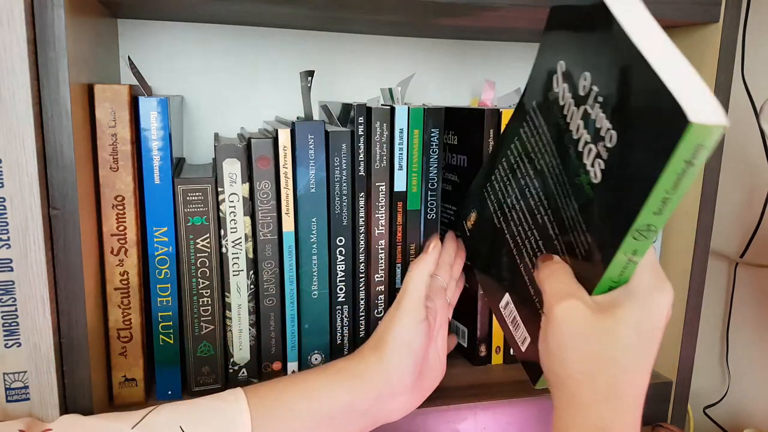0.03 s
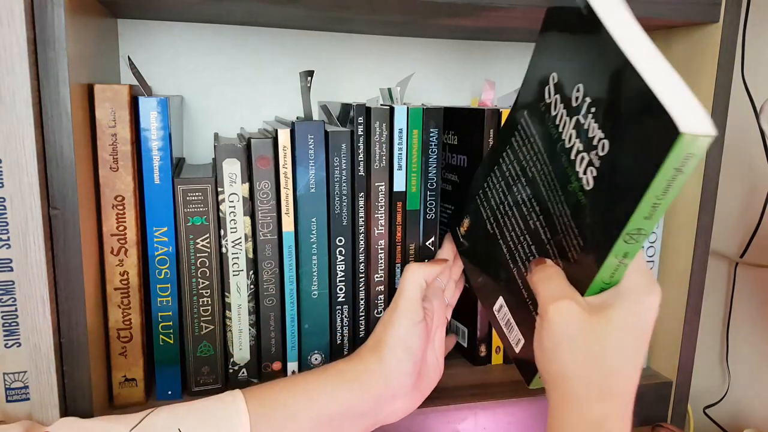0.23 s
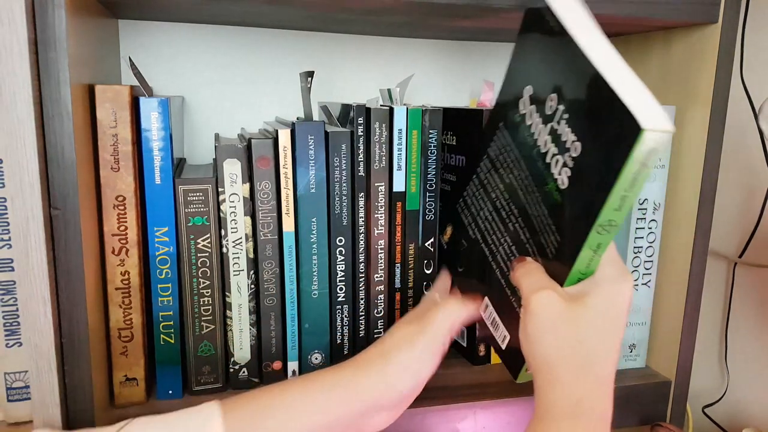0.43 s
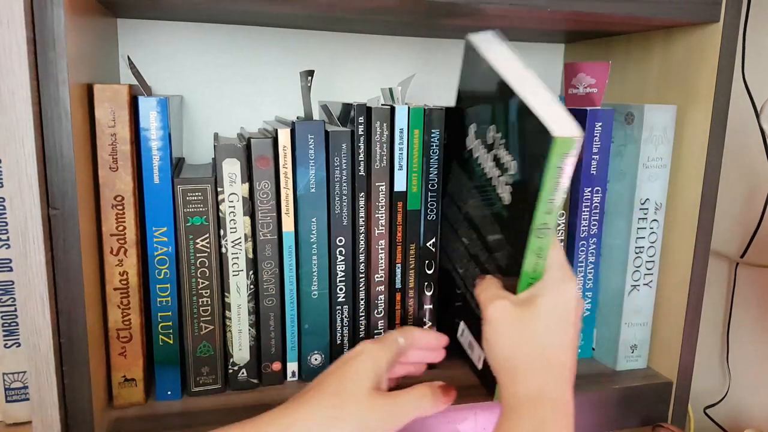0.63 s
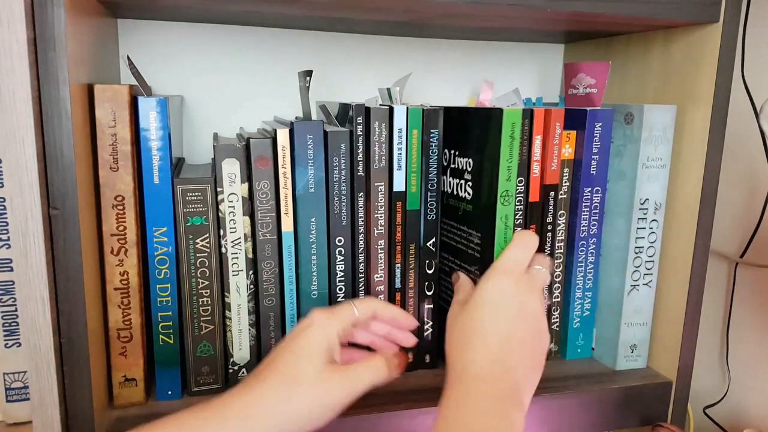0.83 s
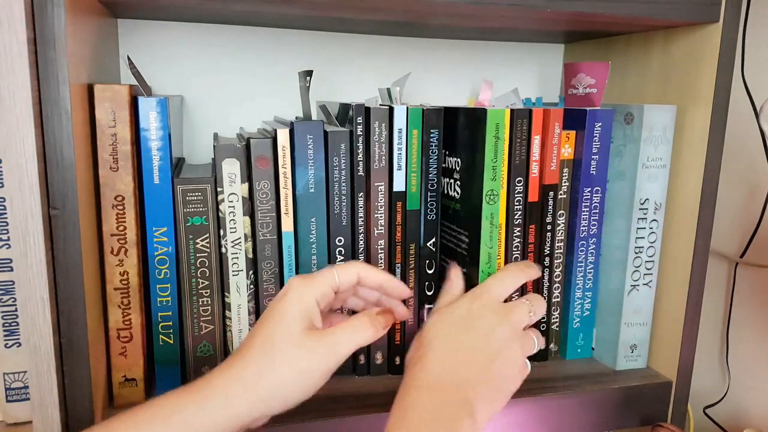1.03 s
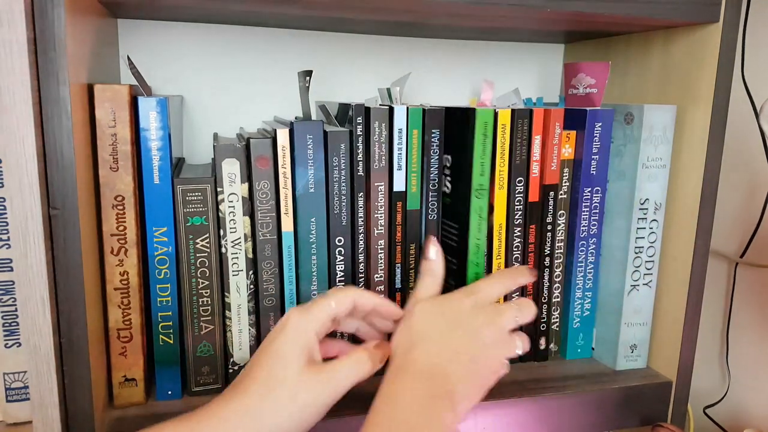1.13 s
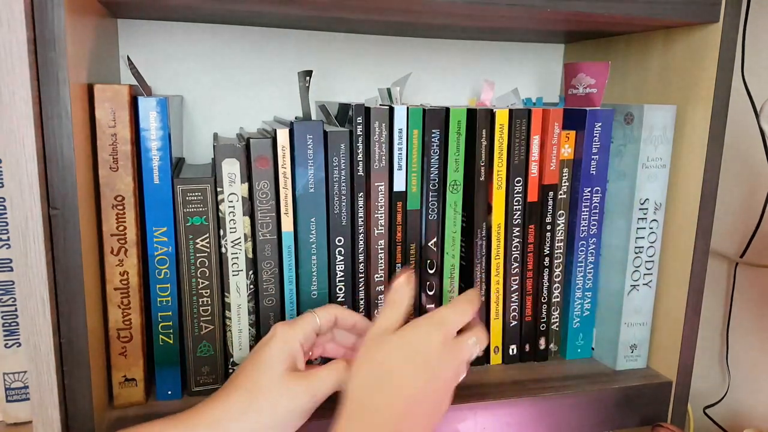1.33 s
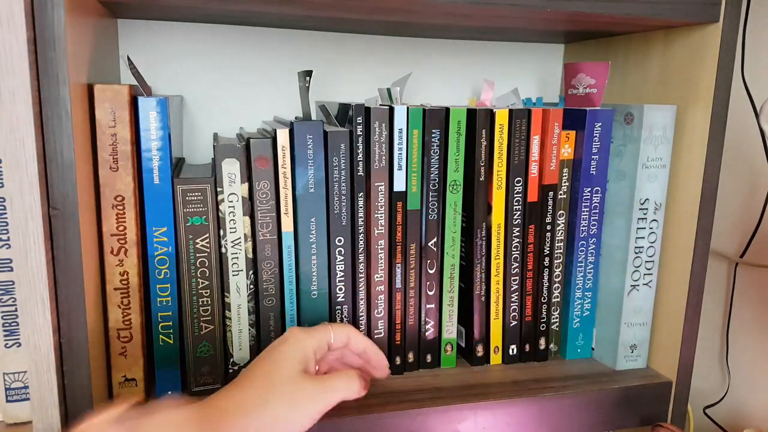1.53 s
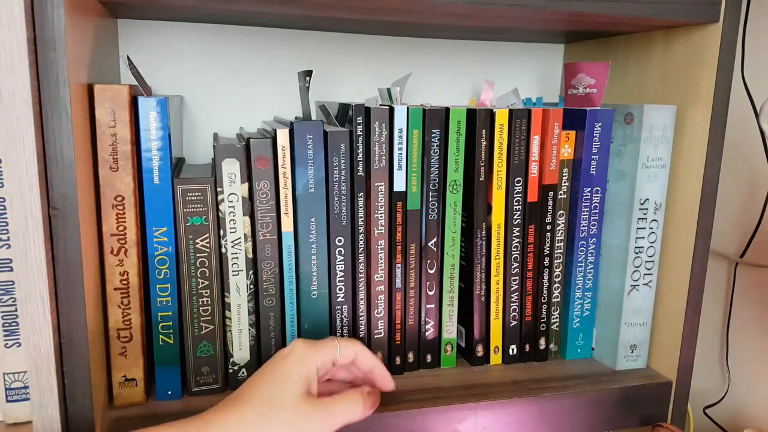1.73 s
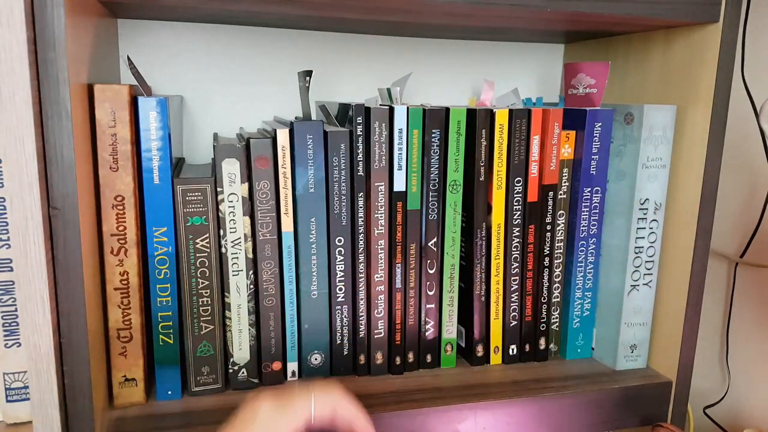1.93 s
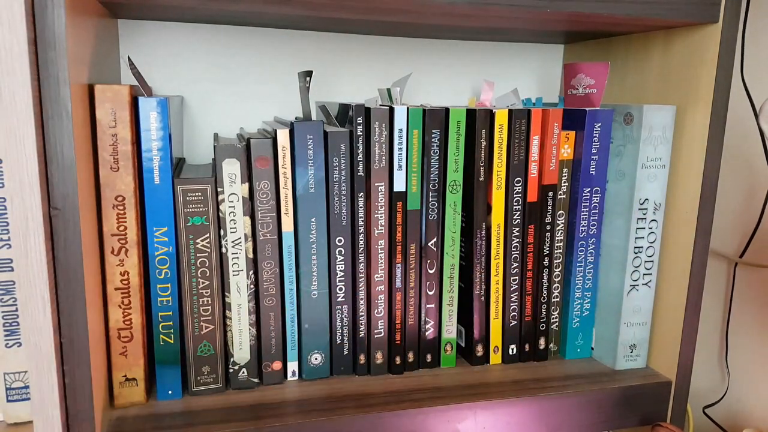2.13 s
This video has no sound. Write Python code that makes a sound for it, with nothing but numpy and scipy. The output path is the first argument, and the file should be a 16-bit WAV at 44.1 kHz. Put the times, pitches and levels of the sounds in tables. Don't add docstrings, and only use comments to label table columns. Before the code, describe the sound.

A paperback lands on a wooden shelf with a stiff slap and clatter, hisses between neighbouring books, then thuds into the back board; faint finger knocks before, light hand brushing after, close stereo in a quiet room.

```python
import sys
import numpy as np
from scipy import signal
from scipy.fft import rfft, irfft
from scipy.io import wavfile
from scipy.ndimage import uniform_filter1d

SR = 44100
rng = np.random.default_rng(int(sys.argv[2]) if len(sys.argv) > 2 else 0)


def ratio_of_db(decibels):
    return 10 ** (np.asarray(decibels, float) / 20)


def to_wav(sig):
    pcm = np.clip(np.atleast_2d(sig), -1, 1) * 32767
    pcm = np.round(pcm).astype(np.int16)
    wavfile.write(sys.argv[1], SR, pcm.T)


N = 97020
LANDING_S = 0.9014


def read(points, hz):
    f, value = np.transpose(points)
    return np.interp(np.log(hz + 1), np.log(f + 1), value)


def curve(points):
    s, db = np.transpose(points)
    return ratio_of_db(np.interp(np.arange(N) / SR, s, db, -120, -120))


def add(mix, s, sound, lag=0, pan_db=0):
    left = (s * SR + lag, ratio_of_db(pan_db / 2))
    right = (s * SR, ratio_of_db(-pan_db / 2))
    for ch, (at, gain) in enumerate([left, right]):
        part = mix[ch, round(at):][:len(sound)]
        part += gain * sound[:len(part)]


def blip(hz, cycles):
    u = np.arange(int(12 * cycles * SR / hz) + 2) / SR * hz / max(cycles, .1)
    swell = np.e * u * np.exp(-u) * np.exp(-.1 * u ** 2)
    return swell * np.sin(2 * np.pi * cycles * u)


def ring(modes, size):
    t = np.arange(size) / SR
    return -sum(ratio_of_db(db - 60 * t / t60) * np.sin(2 * np.pi * hz * t) for hz, db, t60 in modes)


# (frequency [Hz], likeness [0-1])
LIKENESS = [(60, 0.94), (300, 0.89), (700, 0.24), (1500, .1), (4000, 0.03), (12000, .05)]


def alike(z, hz):
    same = np.clip(read(LIKENESS, hz), -1, 1)[:, None]
    side = np.sqrt((1 - same) / 2) * z[1]
    return np.sqrt((1 + same) / 2) * z[0] + np.array([side, -side])


def noise(tone, patchy_db, flicker_db):
    frames, hz = N // 128 + 5, np.fft.rfftfreq(512, 1 / SR)
    a, b, patches = rng.standard_normal((frames, 257, 2, 3)).T
    patches = uniform_filter1d(patches[0], size=8, axis=0)
    patches = uniform_filter1d(patches, size=12, axis=1)
    flicker = uniform_filter1d(rng.standard_normal(frames), size=3)
    db = read(tone, hz)[:, None]
    db = db + patchy_db * patches / patches.std() + flicker_db * flicker / flicker.std()
    x = signal.istft(alike(a + 1j * b, hz) * ratio_of_db(db), nperseg=512, noverlap=384)[1][:, :N]
    return x / x.std()


# (frequency [Hz], level [dB])
AIR_TONE = [(25, -13.5), (55, -4), (90, -17.5), (135, -10.5), (220, -29), (600, -36.5), (3000, -40),
            (6000, -54), (16000, -55.5)]
AIR_DB = -55.5


def hush():
    hz = np.fft.rfftfreq(N, 1 / SR)
    a, b = rng.standard_normal((2, 2, len(hz), 1))
    z = alike(a + 1j * b, hz) * ratio_of_db(read(AIR_TONE, hz))[:, None]
    x = irfft(z[..., 0], N)
    return ratio_of_db(AIR_DB) * x / x.mean(0).std()


# (frequency [Hz], t60 [s])
ROOM_DECAY = [(60, 0.19), (200, 0.25), (600, 0.23), (1500, 0.38), (4000, 0.22), (10000, 0.17)]


def room(x):
    taps = np.zeros((2, SR // 2))
    jitter = rng.integers(0, 20, (2, (SR // 2 - 121) // 20))
    at = np.arange(120, SR // 2 - 20, 20) + jitter
    np.put_along_axis(taps, at, rng.choice([-1., 1.], at.shape), 1)
    hz, t, z = signal.stft(taps, SR, nperseg=512)
    decay = ratio_of_db(-60 * t / read(ROOM_DECAY, hz)[:, None])
    tail = signal.istft(alike(z, hz) * decay, SR, nperseg=512)[1]
    return signal.fftconvolve(x.mean(0)[None], tail / np.linalg.norm(tail[0]), axes=1)[:, :N]


# (time [s], level [dB])
BRUSH = [(1.38, -78), (1.55, -63.5), (1.72, -57), (1.82, -61), (1.87, -57.5), (2.03, -63), (2.2, -72.5)]
# (frequency [Hz], level [dB])
BRUSH_TONE = [(530, -71.5), (900, -34), (935, -8.5), (1120, -12), (2310, -8), (3530, -12.5), (5400, -23.5),
              (9000, -31.5), (11700, -35.5), (19800, -120)]
# (time [s], level [dB], t60 [s])
RATTLES = [
    (.903, -38.5, 0.4),
    (1.318, -41, 0.29),
]
SCUFF_S, SCUFF_LENGTH_S, SCUFF_DB = 0.6316, 0.022, -56.5


def brushing():
    t = np.arange(N) / SR
    scuff = ratio_of_db(SCUFF_DB) * np.exp(-((t - SCUFF_S) / SCUFF_LENGTH_S) ** 2)
    rattle = np.zeros(N)
    for s, db, t60 in RATTLES:
        onset = np.clip((t - s) / .006, 0, 1)
        rattle += onset * ratio_of_db(db - 60 * abs(t - s) / t60)
    return (curve(BRUSH) + scuff + rattle) * noise(BRUSH_TONE, patchy_db=1.45, flicker_db=0.23)


# (start [s], length [s], slip rate [1/s], level [dB])
CREAKS = [
    (0.285, .03, 125, -47),
    (.3748, 0.037, 148, -40),
]
# (time [s], level [dB], pitch [Hz], length [cycles])
TICKS = [(0.598, -49, 2470, .6), (0.709, -55, 5900, 5.7), (.833, -40.5, 11970, 9.5),
         (0.886, -41, 11900, 7.5), (1.011, -49, 10100, .8), (1.7203, -34.5, 11400, 0.87),
         (1.725, -45.5, 5770, 1.7), (1.815, -43.5, 12120, 2.5), (1.8157, -46.5, 8340, 2.1),
         (1.8388, -37.5, 2360, 0.45), (1.8393, -45, 9050, 2.1), (1.8397, -52, 6070, 5),
         (1.8505, -37, 2946, 0.57), (1.8507, -49, 12250, 2), (2.025, -64, 1628, 30),
         (2.004, -73, 10300, 135), (.3425, -49.5, 2000, .5), (0.628, -45, 3186, .6),
         (.633, -51.5, 4200, .6), (.645, -47, 2800, .6), (0.765, -49, 1500, .8), (.811, -49, 1600, .7),
         (1.3215, -40, 3530, .6), (1.3255, -32, 3300, .6), (1.354, -34.5, 2600, .7)]
CREAK_HZ, CREAK_CYCLES, CREAK_BODY_DB = 790, 0.39, -5
CREAK_LOW_HZ, CREAK_HIGH_HZ = 560, 1480
TICK_GRIT_DB, TICK_GRIT_S = -12, .002


def fingers():
    out, slips = np.zeros((2, 2, N))
    for start, length, rate, db in CREAKS:
        at = np.arange(0, length, 1 / rate)
        for s, (early, size) in zip(at, rng.standard_normal((12, 2))):
            slip = start + s + 0.00036 * early
            add(slips, slip, -ratio_of_db(db + 1.5 + 1.1 * size) * blip(CREAK_HZ, CREAK_CYCLES), 6)
            add(out, slip, -ratio_of_db(db + CREAK_BODY_DB) * blip(rate, 0.28), 3)
    t = np.arange(800) / SR
    for (s, db, hz, cycles), grit in zip(TICKS, rng.standard_normal((len(TICKS), 800))):
        click = blip(hz, cycles)
        crumbs = ratio_of_db(TICK_GRIT_DB) * np.exp(-t / TICK_GRIT_S) * grit / np.linalg.norm(click)
        crumbs[0] = 1
        add(out, s, -ratio_of_db(db) * np.convolve(crumbs, click), 1)
    band = signal.butter(3, [CREAK_LOW_HZ, CREAK_HIGH_HZ], "band", fs=SR, output="sos")
    return out + signal.sosfilt(band, slips)


# (time [s], level [dB])
DRAG = [(0, -56), (.2, -72.5), (.38, -60.5), (.52, -57), (.58, -67), (.63, -50), (.68, -63), (.8, -55),
        (.86, -51), (1.02, -47), (1.1, -58), (1.15, -44), (1.22, -49.5), (1.29, -46), (1.34, -28.5),
        (1.55, -64), (1.72, -58), (2.2, -69.5)]
# (frequency [Hz], level [dB])
DRAG_TONE = [(60, -41), (130, -2), (200, -11.5), (300, -13), (520, -8), (1130, -18), (2500, -35),
             (5500, -86.5)]


def dragging():
    return curve(DRAG) * noise(DRAG_TONE, patchy_db=1.2, flicker_db=1.8)


# (time [s], level [dB])
SLIDE = [(0, -78), (.03, -64.5), (.08, -93), (.42, -72), (.6, -63.5), (.66, -64), (.74, -59.5), (.79, -63),
         (.83, -54), (.895, -52.5), (.97, -80), (1.03, -63), (1.06, -53.5), (1.1, -64), (1.15, -53.5),
         (1.31, -55), (1.39, -70), (2.2, -74)]
# (frequency [Hz], level [dB])
SLIDE_HISS = [(880, -33), (1500, -15.5), (1640, -6.5), (2100, -3), (3150, -2), (3380, -6), (10500, -4.5),
              (16000, -4)]


def sliding():
    sides = ratio_of_db(np.array([[1.5], [-.5]]))
    return curve(SLIDE) * sides * noise(SLIDE_HISS, patchy_db=1.1, flicker_db=1.6)


# (time [s], force [dB], contact [ms])
BLOWS = [
    (0.046, -57.5, 0.94),
    (0.441, -45, 1.7),
    (.51, -49, 1.64),
    (0.629, -54, 1),
    (0.811, -37.5, 2),
    (0.903, -34.5, 3),
    (.934, -41.5, 2.7),
    (1.318, -21, 1.37),
    (1.3237, -11, 1.6),
]
# (frequency [Hz], level [dB], t60 [s])
BOARD = [(99.5, -2, 0.2), (126.4, 3, .18), (168, 0.5, 0.053), (202.3, 0.5, .2), (259.6, -5.5, 0.12),
         (354.7, -10, 0.22), (388.5, -3, 0.16), (469.6, -5.5, 0.078), (525.3, -0.5, .17), (578, -10, 0.094),
         (740, -17.5, 0.063), (811, -5.5, .2), (1040, -11.5, .25)]
# (time [s], level [dB], pitch [Hz])
BOOMS = [
    (0.444, -72, 82),
    (.635, -55, 65),
    (0.913, -25, 62.4),
    (1.321, -11.5, 58.1),
]
BOOM_RISE_S, BOOM_T60_S = 0.017, 0.29
BOARD_LOW_HZ = 70


def shelf():
    force, out, t = np.zeros((2, N)), np.zeros((2, N)), np.arange(SR // 2) / SR
    for s, db, ms in BLOWS:
        push = np.hanning(int(ms * SR / 1000) + 3)
        add(force, s, ratio_of_db(db) * push / push.sum(), 3)
    for s, db, hz in BOOMS:
        swell = 1 - np.exp(-t / BOOM_RISE_S)
        add(out, s, swell * ring([(hz, db, BOOM_T60_S)], size=SR // 2))
    low_cut = signal.butter(2, BOARD_LOW_HZ, "high", fs=SR, output="sos")
    board = signal.sosfilt(low_cut, ring(BOARD, size=SR // 2))
    return out + signal.fftconvolve(force, board[None], axes=1)[:, :N]


# (time [s], level [dB], pitch [Hz], length [cycles], left lag [samples])
KNOCKS = [(.044, -20.5, 485, 0.81, 34), (.343, -55.5, 560, 1.16, 12), (.439, -25.5, 554, 1.4, 9.5),
          (0.445, -34.5, 304, 1.03, 13.5), (.457, -37.5, 200, 0.85, 4), (.481, -42.5, 495, 1.5, 4),
          (.627, -32, 618, 0.59, 9), (.643, -45.5, 870, 1.7, 7), (.765, -35.5, 636, 1.37, 9.5),
          (.792, -61, 597, 3.4, 16), (.810, -27.5, 525, 1.67, 8), (.813, -33.5, 326, .7, 9),
          (.817, -30.5, 213, 0.49, 17), (0.878, -39, 595, 0.96, -3.5), (.905, -7.5, 563, 0.86, -10),
          (.903, -19, 148.4, 0.64, 1.5), (.906, -16, 336, 1.6, 5.5), (.924, -12, 700, 0.98, -16),
          (.9333, -6, 551, 0.8, 9), (.941, -14, 519, 1.06, 6), (.957, -18, 806, 0.93, 6.5),
          (.967, -18.5, 700, 0.82, 4), (1.001, -29, 518, 1.9, -0.5), (1.06, -37.5, 500, 1.95, -0.5),
          (1.317, -7, 422, 0.88, 6.5), (1.334, -8, 190.6, 0.72, 9), (1.363, -14, 178, 0.96, 2.5),
          (1.35, -6.5, 586, 1.04, -6.5), (1.392, -18, 440, 0.65, -4.5), (1.417, -30, 198, 2, -6),
          (1.443, -36, 504, 2.6, -6.5), (1.704, -44.5, 930, 1.6, 9)]
KNOCK_PAN_DB = 1


def knocks(heavy):
    out = np.zeros((2, N))
    for s, db, hz, cycles, lag in KNOCKS:
        if heavy == (s > LANDING_S):
            add(out, s, ratio_of_db(db) * blip(hz, cycles), lag, KNOCK_PAN_DB)
    return out


# (time [s], level [dB], left lag
CRACKS = [(0.046, -46.5, 2.4), (0.342, -55.5, 8.2), (.44, -53, 3.4), (0.626, -56, 6.6), (.645, -48.5, 6),
          (0.765, -47, 6), (0.81, -42, 7.6), (0.9014, -13.5, 9), (0.9035, -2, 13.84), (.909, -9.5, 8.9),
          (1.32, -24, 8), (1.3249, -23.5, 6.1), (1.347, -28, 9.7), (.933, -21.5, 8), (0.958, -33, 8),
          (1.333, -28, 7), (1.341, -33.5, 9.1), (1.353, -28, 6), (1.392, -39.5, 7.6)]
# (frequency [Hz], level [dB])
COVER_TONE = [(400, -38.5), (900, -1), (1600, 2.5), (2250, -1), (2900, -18), (4000, -19), (7000, -36),
              (16000, -49.5)]
# (frequency [Hz], level [dB], t60 [s])
COVER_RING = [(1065, -25, .15), (1399, -23, 0.063), (1444, -18, 0.05), (1838, -23, 0.24),
              (2257, -28.5, 0.14), (2310, -21, 0.085), (2644, -33.5, 0.12)]
SLAP_PAN_DB, CRACK_T60_S = -5.5, 0.022


def cracks():
    out, t, hz = np.zeros((2, N)), np.arange(2048) / SR, np.fft.rfftfreq(2048, 1 / SR)
    fade = np.minimum(t / 0.00027, 1) * ratio_of_db(-30 * t / CRACK_T60_S)
    for (s, db, lag), grit in zip(CRACKS, rng.standard_normal((len(CRACKS), 2048))):
        z = rfft(grit * fade ** 2)
        crack = fade * irfft(z / abs(z) * ratio_of_db(read(COVER_TONE, hz)))
        add(out, s, ratio_of_db(db) * crack / abs(crack).max(), lag, SLAP_PAN_DB)
        add(out, s, ratio_of_db(db) * ring(COVER_RING, size=SR // 4), lag, SLAP_PAN_DB)
    return out


def scene():
    parts = [  # (sound, room send in dB)
        (fingers(), -12),
        (shelf(), -15.5),
        (knocks(False), -9),
        (knocks(True), -6),
        (cracks(), -8.5),
    ]
    direct = sum(x for x, _ in parts)
    reflected = room(sum(x * ratio_of_db(db) for x, db in parts))
    rubbing = sliding() + dragging() + brushing()
    return direct + reflected + rubbing + hush()


def band_limit(x):
    return signal.sosfilt(signal.butter(12, 16470, fs=SR, output="sos"), x)


def record(dry):
    low_cut = signal.butter(3, 63.3, "high", fs=SR, output="sos")
    top_cut = signal.firwin(511, 15950, window=("kaiser", 9), fs=SR)
    mix = signal.oaconvolve(signal.sosfilt(low_cut, dry), top_cut[None], "same")
    return band_limit(mix)


dry = scene()
out = record(dry)
to_wav(out)
```